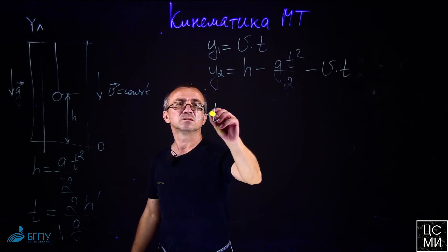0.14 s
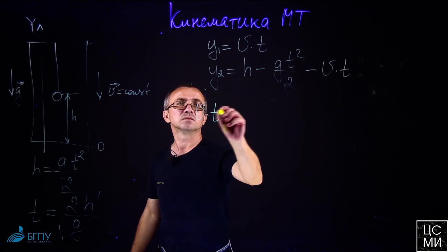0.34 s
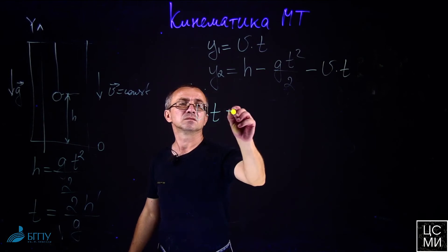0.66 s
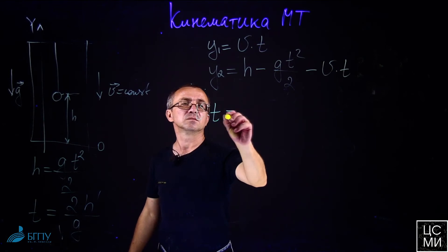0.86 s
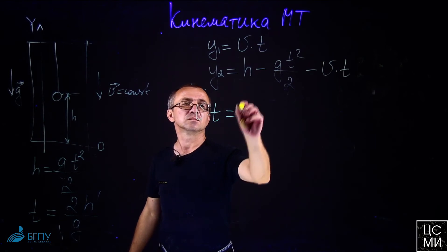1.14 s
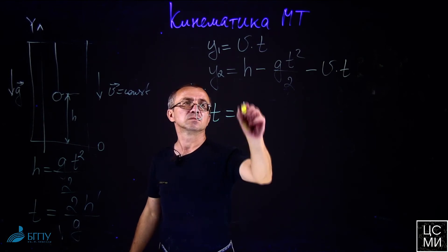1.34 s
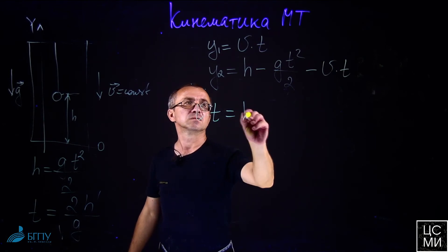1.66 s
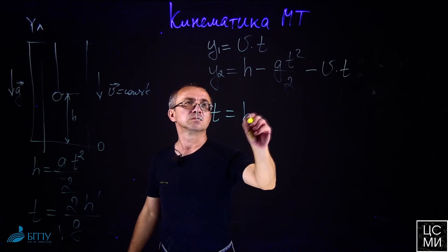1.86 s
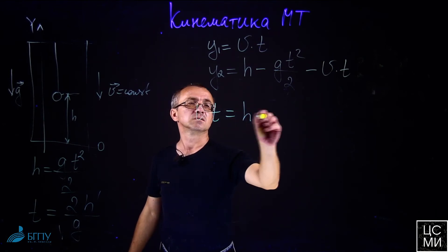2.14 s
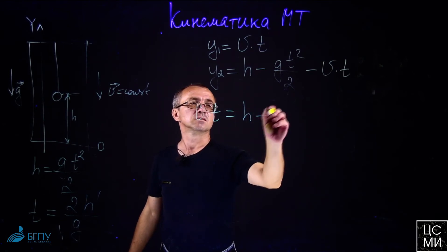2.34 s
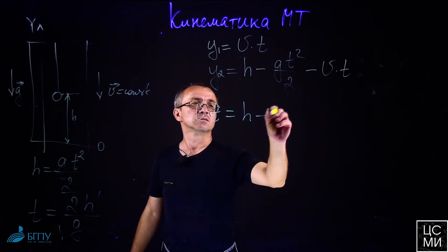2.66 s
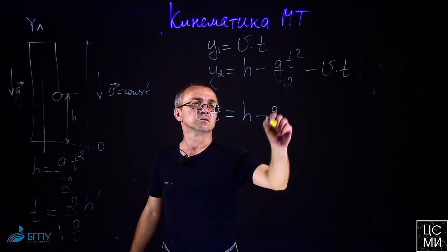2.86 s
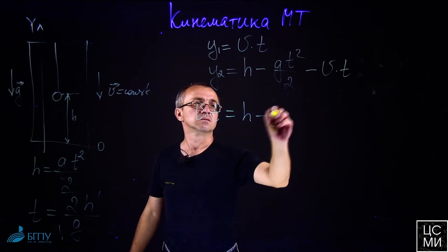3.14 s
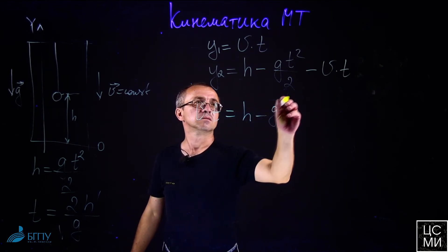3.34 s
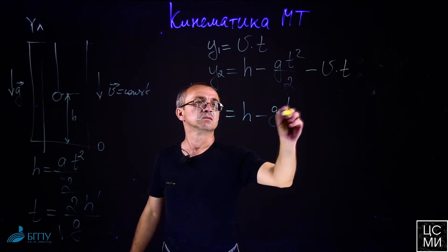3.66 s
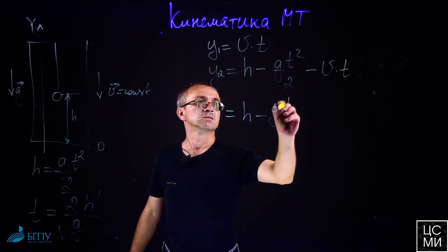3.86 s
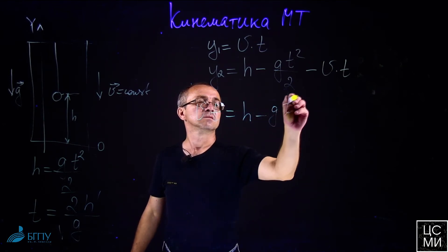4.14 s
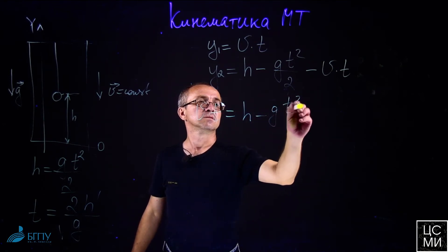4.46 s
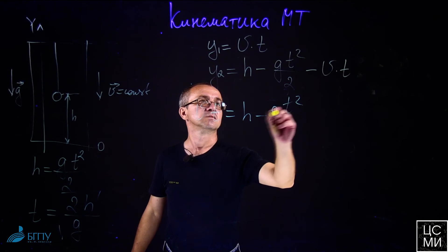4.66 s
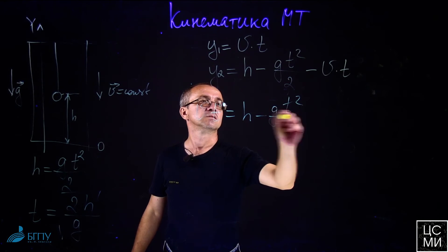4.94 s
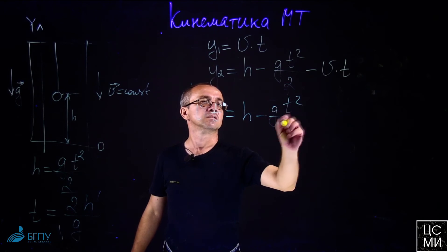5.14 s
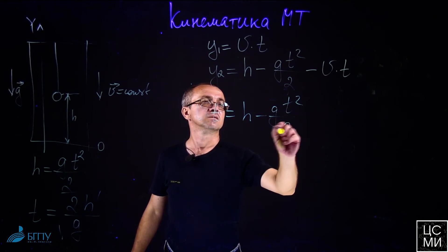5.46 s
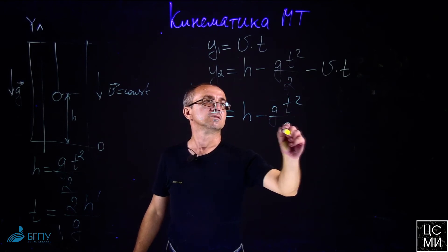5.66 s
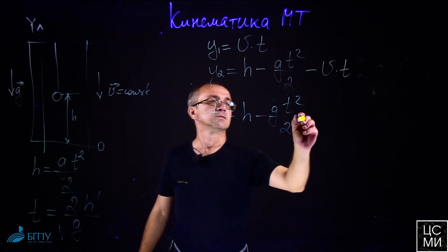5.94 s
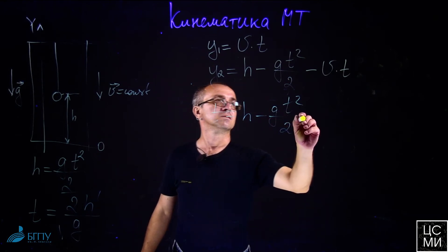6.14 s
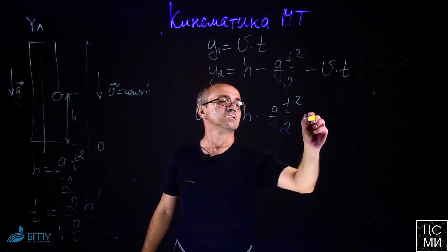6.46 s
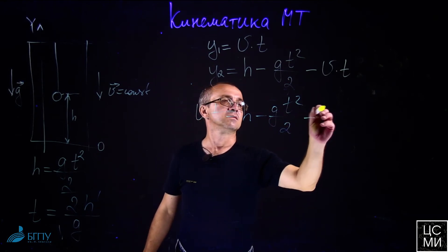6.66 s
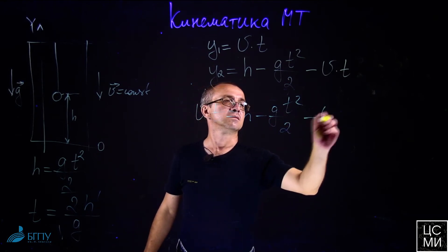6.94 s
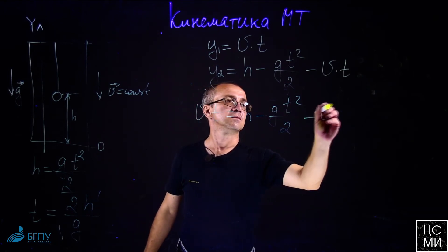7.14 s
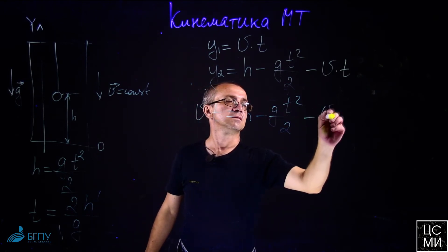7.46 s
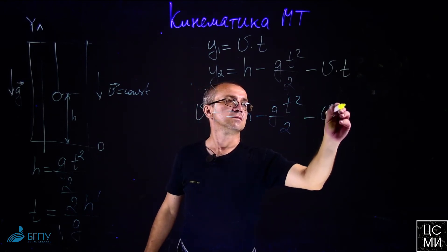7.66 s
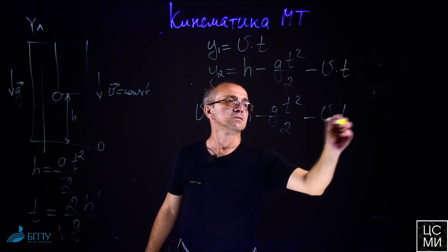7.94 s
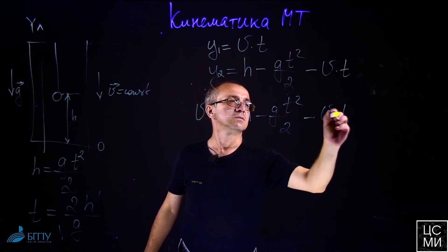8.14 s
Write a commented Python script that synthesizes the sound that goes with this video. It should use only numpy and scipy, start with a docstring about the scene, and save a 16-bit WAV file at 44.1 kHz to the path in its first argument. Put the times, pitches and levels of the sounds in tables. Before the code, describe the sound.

Marker strokes on glass: a dull low knock as the tip lands, then a high, clean chirping squeak bending quickly in pitch. Clusters come several times a second, broken by small gaps, with occasional dry ticks. A rough flurry and a sharp click come late, then the loudest squeaks near the end. The microphone is fairly near in a hard-walled quiet room with soft air hum and deep rumble.

```python
"""Squeaks that glide up and down, many of them started by a soft boomy tap, in a quiet, bare room.
A felt marker writes on a large glass board: the tip lands and rings the pane, then sticks and slips
a few thousand times a second, and the pitch follows the hand. Noise puffs make the dry ticks, and short
sine sweeps the chirps. The walls smear it all into a short wash over ventilation hum and a low rumble."""
import sys
import numpy as np
from scipy import signal
from scipy.fft import rfft, irfft, next_fast_len
from scipy.io import wavfile
from scipy.ndimage import uniform_filter1d, map_coordinates

SR = 44100
rng = np.random.default_rng(int(sys.argv[2]) if len(sys.argv) > 2 else 0)


def inscribe(sig):
    """Save sig as 16-bit PCM at rate SR to the path in sys.argv[1].

    A 1-D sig is mono; a 2-D sig holds one channel per row.
    Samples are clipped to [-1, 1] before scaling.
    """
    pcm = np.round(np.clip(np.atleast_2d(sig).T, -1, 1) * 32767)
    wavfile.write(sys.argv[1], SR, pcm.astype(np.int16))


N = 366471  # length of the scene in samples

# All levels below are those of the source itself, before the final mix.
# Steady room noise. Each row: frequency in Hz, relative level in dB per Hz.
AIR_SPECTRUM = [(35, -30), (60, -1.5), (135, 2), (413, -6), (534, -6), (706, -7.5), (812, -6),
                (1590, -16.5), (2260, -21), (3060, -23), (3510, -30), (6000, -32), (15600, -38)]
# Colour of the deep rumble. Each row: frequency in Hz, relative level in dB per Hz.
RUMBLE_SPECTRUM = [(5.9, -40), (10, 5.5), (20, -1), (90, -15.5), (120, -34), (200, -120)]
# The tip lands on the pane. Each row: time in seconds, overall level in dB,
# level of the higher modes (the knock) over the low ones (the boom) in dB.
TAPS = [(0.044, -52, 2.5), (0.392, -49.5, 1.5), (0.497, -65, -16), (0.71, -50, 3.5), (1.126, -45.5, -3.5),
        (1.881, -50.5, 1), (2.294, -46, -2.2), (2.566, -53, -4), (2.907, -62, 2), (3.219, -47, -3),
        (3.708, -41.5, -5.5), (3.983, -46, -1.5), (4.316, -53, -1.5), (4.631, -49, -2.7), (5.047, -48, 1.7),
        (5.545, -60, 4), (5.816, -51.5, -2.5), (6.545, -47, 0), (7.204, -41, -4.5), (7.493, -50, 4.5),
        (8.015, -48.5, 3), (8.176, -53.5, 5.5)]
# Ringing modes of the pane. Each row: frequency in Hz, relative level in dB,
# time to die by 60 dB in seconds.
PANE_MODES = [(120, -8, 0.2), (153.7, -4, 0.55), (170.4, 2.5, 0.11), (222.4, -1, 0.12), (253.6, 1.5, 0.1),
              (297, -5, 0.15), (366, -1, 0.071), (533, 2, 0.044), (590, -1, 0.028)]
# Pen strokes. Each row: fundamental over overtones 2-3 in dB (at the usual grip and slip rate),
# high overtones against overtones 2-3 in dB, roughness from 0 to 1, gain of the fundamental
# from start to end in dB, and a path of points. Each point: time in seconds, slip rate in Hz,
# grip given as the basic level of overtones 2-3 in dB (before build-up, swerve, flicker and glass).
# Overtone 2 lies at twice the slip rate, overtone 3 at three times, and so on.
STROKES = [ (11.1, -13, .01, -1, [(0.095, 3027, -67), (0.138, 2943, -61), (0.18, 2875, -61),
           (0.21, 2887, -64), (0.235, 2933, -75)]), (11.4, -12, .01, -3, [(0.415, 2733, -68.5),
           (0.45, 2918, -67), (0.5, 2700, -61.5), (0.53, 2720, -67)]),
           (12.4, -12, .02, 8, [(0.74, 2527, -57.5), (0.755, 2720, -64.5), (0.78, 2900, -61),
           (0.825, 2905, -63), (0.84, 3090, -76)]), (12, -12, .03, 0, [(1.165, 2960, -77),
           (1.19, 2910, -79)]), (12.8, -3.5, 0.025, 9, [(1.19, 3180, -76), (1.2, 3070, -73),
           (1.215, 2603, -63.5), (1.272, 2502, -60.5), (1.33, 2380, -61.5)]),
           (15, -6, .25, 0, [(1.331, 2372, -57), (1.342, 2250, -62.5), (1.36, 1690, -66.5)]),
           (14.8, -9.5, 0.113, -3, [(1.44, 3124, -89), (1.49, 2827, -73), (1.537, 2550, -64.5),
           (1.57, 2200, -79), (1.59, 2405, -70), (1.617, 2390, -63.5), (1.637, 2230, -66.5),
           (1.648, 2010, -64), (1.66, 2070, -62), (1.675, 1900, -65.5), (1.69, 2060, -63)]),
           (14.3, -6.5, 0.13, 3.5, [(1.935, 2455, -68), (1.96, 2580, -63.5), (1.985, 2640, -63),
           (1.993, 2347, -58.5), (2.005, 2373, -61), (2.03, 2610, -62), (2.047, 2644, -64),
           (2.06, 2145, -59)]), (18.8, -11, .05, 3.5, [(2.325, 2940, -74.5), (2.37, 2880, -81),
           (2.398, 2915, -74)]), (14.9, -10, 0.071, 18, [(2.4, 2944, -68), (2.43, 2765, -63.5),
           (2.46, 2520, -64.5), (2.505, 2710, -70), (2.535, 2652, -64.5), (2.57, 2745, -70.5),
           (2.635, 2630, -93)]), (6, -11, 0.27, 10, [(2.645, 2790, -66), (2.66, 2740, -61.5),
           (2.677, 3220, -77)]), (13.5, -9, 0.051, -15, [(2.71, 2944, -76), (2.76, 2728, -61),
           (2.785, 2460, -71), (2.815, 2852, -71), (2.845, 3264, -73.5), (2.88, 3212, -70.5),
           (2.9, 3014, -70), (2.92, 3004, -62), (2.967, 2763, -60), (3.0, 2855, -74)]),
           (12, -9, .03, 11, [(3.325, 3330, -88), (3.345, 3160, -83)]),
           (14.7, -8, .06, 12, [(3.35, 3140, -64), (3.362, 2785, -66.5), (3.42, 2620, -62.5),
           (3.44, 2488, -62), (3.455, 1843, -69), (3.47, 1942, -74.5), (3.49, 2620, -64),
           (3.515, 2724, -60.5), (3.535, 2740, -61.5)]), (16.7, -3.5, 0.076, 2, [(3.742, 2420, -71),
           (3.759, 2666, -59), (3.792, 2620, -55), (3.819, 2764, -62), (3.829, 2560, -72)]),
           (21, -8, 0.087, 9, [(4.0, 2215, -72), (4.012, 2640, -68), (4.03, 2563, -61.5), (4.05, 2537, -64),
           (4.09, 2553, -85)]), (13, -11, .06, 1.5, [(4.1, 2590, -84), (4.12, 2750, -75),
           (4.155, 3006, -70), (4.185, 2940, -63.5), (4.2, 2310, -70)]),
           (17.2, -7, 0.23, 6, [(4.215, 1933, -77), (4.225, 1980, -67), (4.24, 2055, -59),
           (4.25, 2630, -57.5), (4.275, 2944, -54), (4.3, 2987, -63), (4.31, 2350, -59.5),
           (4.32, 2150, -68)]), (13.15, -13, 0.074, 8, [(4.675, 2796, -65.5), (4.71, 2887, -59.5),
           (4.725, 2870, -55), (4.74, 2580, -63), (4.76, 3220, -67)]),
           (22.9, -5, 0.28, -1, [(4.853, 2424, -57.5), (4.878, 2080, -91)]),
           (15.3, -12, 0.072, 12, [(5.1, 3184, -81), (5.125, 3050, -73), (5.18, 2486, -65),
           (5.2, 2740, -72), (5.22, 2795, -72.5), (5.238, 2800, -72)]),
           (17.2, -8, 0.11, 3, [(5.24, 2794, -66), (5.26, 2678, -62), (5.28, 2700, -62), (5.3, 2730, -62),
           (5.34, 2466, -61.5)]), (13.6, -10.5, 0.083, 6, [(5.385, 2958, -61.5), (5.43, 2923, -67.5),
           (5.445, 2684, -58), (5.465, 2230, -62), (5.475, 2070, -66), (5.488, 2510, -56.5),
           (5.51, 3010, -59), (5.53, 3170, -72)]), (22.4, -10, 0.036, 0, [(6.165, 2250, -72.5),
           (6.18, 2498, -64), (6.197, 2532, -60.5), (6.225, 2450, -60), (6.25, 2416, -58.5),
           (6.28, 2267, -65.5), (6.295, 1860, -78)]), (14.9, -4, 0.095, 3.5, [(6.645, 3380, -72),
           (6.66, 2750, -63), (6.693, 2587, -59.5), (6.728, 2415, -64), (6.77, 2363, -66)]),
           (19, -11.5, 0.14, 1, [(6.772, 2363, -60.5), (6.81, 2505, -56), (6.84, 2587, -62),
           (6.86, 2730, -69)]), (21.5, -9, 0.13, -1.5, [(6.9, 3050, -73), (6.93, 2836, -66.5),
           (6.945, 2670, -68)]), (17.8, -15, 0.49, 1, [(6.946, 2640, -64), (6.96, 1754, -59),
           (6.978, 1420, -76.5)]), (20.3, -8, .2, -9, [(6.988, 2932, -60), (7.002, 2850, -62.5),
           (7.013, 2740, -58.5)]), (24.6, -6, 0.24, -4, [(7.024, 2610, -57), (7.03, 2450, -67),
           (7.042, 2365, -64)]), (19.5, -14, .15, 8, [(7.23, 2372, -63.5), (7.25, 2250, -80)]),
           (18.4, -9, .03, 14, [(7.54, 2530, -85), (7.555, 2890, -79), (7.575, 3110, -80)]),
           (10.2, -6.5, .04, -8, [(7.583, 2820, -75), (7.606, 2720, -60.5), (7.661, 2613, -57.5),
           (7.701, 2468, -58), (7.715, 2050, -64.5), (7.731, 1500, -49.5)]),
           (19.5, -7, 0.14, 4, [(7.732, 1504, -70), (7.751, 1817, -62.5), (7.776, 2670, -56),
           (7.8, 2993, -50), (7.818, 3265, -64), (7.841, 2800, -62), (7.853, 2260, -50.5)]),
           (16.2, -7, 0.24, 3, [(8.066, 2520, -64), (8.091, 2286, -55), (8.11, 2644, -50.5),
           (8.125, 2940, -48), (8.141, 3270, -50)]), ]
# The high overtones. One value for each of overtones 4 to 7: level against the high level in dB.
HIGH_OVERTONES_DB = [2.5, -2, -7, -20]
# How well the pane radiates squeaks and chirps. Each row: frequency in Hz, gain in dB.
GLASS_RESPONSE = [(1200, 9), (2000, 5.5), (3200, 2.5), (4000, 16), (5200, 3.5), (6500, 7), (8000, 6.5),
                  (10500, 5), (13000, -0.5), (15500, 0.5)]
# Dry ticks as the tip catches. Each row: time in seconds, bright level in dB, dull level in dB.
TICKS = [(0.7154, -67, -62), (1.128, -72, -59), (2.2952, -64, -63), (3.2166, -66, -69), (3.707, -62.5, -61),
         (3.985, -63, -56), (4.854, -59, -67), (6.546, -65, -69), (6.9882, -43, -53), (7.2048, -59, -44.5),
         (7.2276, -61, -48), (7.494, -62, -56)]
# Bright part of a tick. Each row: frequency in Hz, relative level in dB per Hz.
BRIGHT_SPECTRUM = [(2500, -32), (3500, 8), (5000, 7), (8000, -13), (15000, -14)]
# Dull part of a tick, from the barrel. Each row: frequency in Hz, relative level in dB per Hz.
BARREL_SPECTRUM = [(400, -18), (800, 10), (2200, -1), (3500, 1.5), (6000, -39)]
# Chirps as the tip lifts off. Each row: time in seconds, start frequency in Hz, end frequency in Hz,
# level in dB before the glass, length in seconds.
CHIRPS = [(5.542, 4450, 3940, -60.5, 0.0107), (5.557, 2300, 1960, -47, 0.017),
          (8.141, 3940, 4120, -51.5, .012)]
# The walls return less treble. Each row: frequency in Hz, gain in dB.
WALL_COLOUR = [(300, 5), (3000, 1.5), (5000, -1.5), (8000, -4.5), (15000, -11.5)]
# How fast the room's wash fades. Each row: frequency in Hz, time to die by 60 dB in seconds.
WALL_DECAY = [(150, 0.29), (1800, 0.67), (4750, 0.72), (8000, 0.46), (12500, 0.51)]

AIR_DB = -60
RUMBLE_REST_DB = -68.5  # level around which the resting rumble drifts
RUMBLE_UNDER_DB, RUMBLE_REFERENCE_DB = -56, -45  # rumble added under a squeak of the reference level
RUMBLE_GROWS, RUMBLE_AVERAGE_S = 0.73, 0.079  # dB of added rumble per dB of squeak; averaging time
USUAL_GRIP_DB, USUAL_PITCH_HZ = -62, 2700
BASE_GROWS, BASE_DB_PER_OCTAVE = 0.82, 19.5  # the fundamental follows grip less, and favours fast slips
HIGH_GROWS = 1.19  # the high overtones follow the grip more
BUILD_DB, BUILD_S = 5, 0.013  # the overtones start this much weaker and build up at this pace
SWERVE_DB, FULL_SWERVE_HZ_PER_S = 6, 60000  # overtone loss in the fastest swerve; where it is reached
WAVER, WAVER_RATE = 0.04, 90  # scale of a fully rough stroke's waver, a share of pitch; knots a second
TICK_T60_S = 0.02  # time for a tick to die by 60 dB
TOP_HZ = 15740  # band limit


def amp(db):
    """Turn decibels into gain."""
    return 10 ** (np.asarray(db) / 20)


def unit(x):
    """Scale a sound to an rms of 1."""
    return x / np.sqrt(np.mean(x ** 2) + 1e-20)


def along(points, hz):
    """Read a curve of (Hz, value) points on a log frequency axis."""
    f, v = np.transpose(points)
    return np.interp(np.log(hz + 1), np.log(f + 1), v)


def wobble(rate):
    """Draw a smooth random curve through so many random knots a second."""
    knots = rng.standard_normal(int(N * rate / SR) + 4)
    return map_coordinates(knots, [np.arange(N) * rate / SR])


def filtered(x, response):
    """Multiply the spectrum of x by a response of frequency."""
    m = next_fast_len(N + SR // 2)
    hz = np.fft.rfftfreq(m, 1 / SR)
    return irfft(rfft(x, m) * response(hz), m)[..., :N]


def coloured(x, curve):
    """Filter x with a curve of (Hz, dB) points."""
    return filtered(x, lambda hz: amp(along(curve, hz)))


def noise(spectrum):
    """Make random hiss of the given colour, with an rms of 1."""
    return unit(coloured(rng.standard_normal(N), spectrum))


def edges(t, length, rise, fall):
    """A gate that opens over rise and closes over fall seconds."""
    return np.clip(np.minimum(t / rise, (length - t) / fall), 0, 1)


def ventilation():
    """Steady air noise whose level drifts very slightly."""
    return amp(AIR_DB + 0.13 * wobble(3.23)) * noise(AIR_SPECTRUM)


def rumble(squeak):
    """A deep rumble that swells with the squeak as the hand leans on the pane."""
    power = uniform_filter1d(squeak ** 2, int(RUMBLE_AVERAGE_S * SR))
    loudness = np.sqrt(np.abs(power)) / amp(RUMBLE_REFERENCE_DB)
    rest = amp(RUMBLE_REST_DB + 2.5 * wobble(6))
    swell = amp(RUMBLE_UNDER_DB) * loudness ** RUMBLE_GROWS
    return (rest + swell) * noise(RUMBLE_SPECTRUM)


def taps():
    """Every landing rings the pane's modes at new strengths; where it lands sets boom against knock."""
    out = np.zeros(N + SR)
    t = np.arange(SR // 2) / SR
    attack = 1 - np.exp(-t / 0.0029)
    scatter_db = rng.normal(0, 2.6, (len(TAPS), len(PANE_MODES)))
    for (start, tap_db, knock_db), scatters in zip(TAPS, scatter_db):
        landing = out[round(start * SR):][:len(t)]  # a view: adding to it adds to out
        for (hz, mode_db, t60), scatter in zip(PANE_MODES, scatters):
            size_db = tap_db + mode_db + scatter
            if hz > 190:  # the knock
                size_db += knock_db
            landing += amp(size_db - 60 * t / t60) * attack * np.sin(2 * np.pi * hz * t)
    return out[:N]


def squeaks():
    """Regular slips make a stack of overtones; they turn ragged in swerves and when the pitch sinks."""
    out = np.zeros(N)
    drift, jitter, grip_wobble, waver = wobble(120), wobble(900), wobble(250), wobble(WAVER_RATE)
    # each overtone comes and goes as the tip rolls
    flicker_db = [3 * wobble(70) for _ in range(len(HIGH_OVERTONES_DB) + 3)]
    for tone_db, high_db, rough, gain_db, path in STROKES:
        s, hz, grip_db = np.transpose(path)
        start, length = s[0], s[-1] - s[0]
        n = np.arange(round(start * SR), round(s[-1] * SR))
        t = n / SR
        # the hand rounds its turns: average over 300 samples
        pitch = uniform_filter1d(np.interp(t, s, hz), size=300, mode="nearest")
        swerve = np.clip(np.abs(np.gradient(pitch)) * SR / FULL_SWERVE_HZ_PER_S, 0, 1)

        # levels in dB against the usual grip: fundamental, overtones 2 and 3, then the high ones
        firm_db = np.interp(t, s, grip_db) - USUAL_GRIP_DB
        base_db = tone_db + gain_db * (t - s.mean()) / length + BASE_GROWS * firm_db
        base_db += BASE_DB_PER_OCTAVE * np.log2(pitch / USUAL_PITCH_HZ)
        over_db = firm_db - SWERVE_DB * swerve - BUILD_DB * np.exp(-(t - start) / BUILD_S)
        high_levels = [high_db + HIGH_GROWS * over_db + db for db in HIGH_OVERTONES_DB]
        levels = [base_db, over_db, over_db] + high_levels

        # below 2000 Hz the slips turn ragged, fully so at 1500 Hz
        ragged = np.clip((2000 - pitch) / 500, 0.4 * swerve + rough, 1)
        shake = 0.0015 * drift[n] + WAVER * rough * waver[n] + (0.001 + 0.04 * ragged) * jitter[n]
        pitch = pitch * (1 + shake)
        phase = 2 * np.pi * np.cumsum(pitch) / SR

        tone = np.zeros(len(n))
        for k, db in enumerate(levels, 1):
            level_db = USUAL_GRIP_DB + db
            if k > 1:  # the fundamental does not flicker
                level_db = level_db + flicker_db[k - 1][n]
            below_limit = k * pitch < SR / 2  # no overtone above what the sample rate can hold
            tone += amp(level_db) * np.sin(k * phase) * below_limit
        unsteady = amp((0.7 + 9 * ragged) * grip_wobble[n])
        out[n] += unsteady * edges(t - start, length, 0.003, 0.003) * tone
    return coloured(out, GLASS_RESPONSE)


def ticks():
    """Short puffs of noise as the tip catches, each with a bright and a dull part."""
    bright, dull = np.zeros((2, N + SR))
    t = np.arange(SR // 10) / SR
    fade_db = -60 * t / TICK_T60_S
    for start, bright_db, dull_db in TICKS:
        first = round(start * SR)
        bright[first:][:len(t)] += amp(bright_db + fade_db)
        dull[first:][:len(t)] += amp(dull_db + fade_db)
    return bright[:N] * noise(BRIGHT_SPECTRUM) + dull[:N] * noise(BARREL_SPECTRUM)


def chirps():
    """As the tip lifts off, a single tone slides in pitch while it swells and fades through the glass."""
    out = np.zeros(N)
    for start, from_hz, to_hz, db, length in CHIRPS:
        t = np.arange(round(length * SR)) / SR
        pitch = from_hz + (to_hz - from_hz) * t / length
        phase = 2 * np.pi * np.cumsum(pitch) / SR
        swell = np.sin(np.pi * t / length)
        out[round(start * SR):][:len(t)] += amp(db) * swell * np.sin(phase)
    return coloured(out, GLASS_RESPONSE)


def near(x, count=10):
    """Ceiling, floor and the writer's body send back early copies, some of them upside down."""
    echo = np.zeros(SR // 20)
    delay = rng.uniform(0.0015, 0.022, count)  # seconds
    echo[(delay * SR).astype(int)] = rng.choice([-1, 1], count) * amp(-60 * delay / 0.29)
    return signal.fftconvolve(x, echo / np.linalg.norm(echo))[:N]


def room(x):
    """The walls answer after a gap with fading noise; each frequency dies at its own speed."""
    hz, t, z = signal.stft(rng.standard_normal(SR), SR, nperseg=256)
    fade = amp(-60 * t / along(WALL_DECAY, hz)[:, None])
    tail = signal.istft(z * fade, SR, nperseg=256)[1]
    delayed = np.pad(x, (200, 0))  # the gap, in samples
    return signal.fftconvolve(delayed, tail / np.linalg.norm(tail))[:N]


def scene():
    """Mix the marker, heard directly and off the walls, with the background."""
    boom = taps()
    tip = squeaks() + ticks() + chirps()
    far = coloured(tip, WALL_COLOUR)
    squeak = amp(-1) * tip + amp(-9) * near(far) + amp(-2.5) * room(far)
    landing = boom + amp(-2.5) * room(boom)
    return (squeak + landing + ventilation() + rumble(squeak))[None]


def record(dry):
    """Keep nothing at or above the band limit."""
    return filtered(dry, lambda hz: hz < TOP_HZ)


dry = scene()
out = record(dry)
inscribe(out)
```